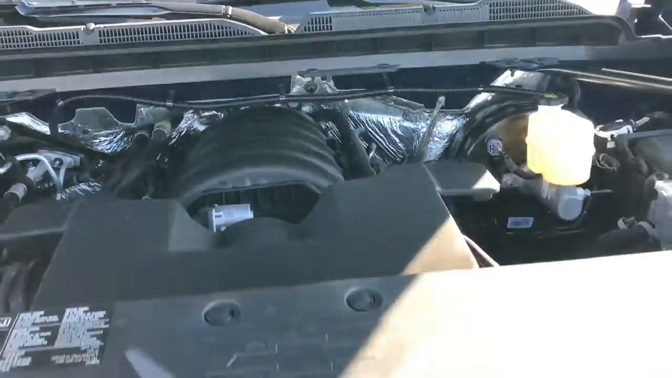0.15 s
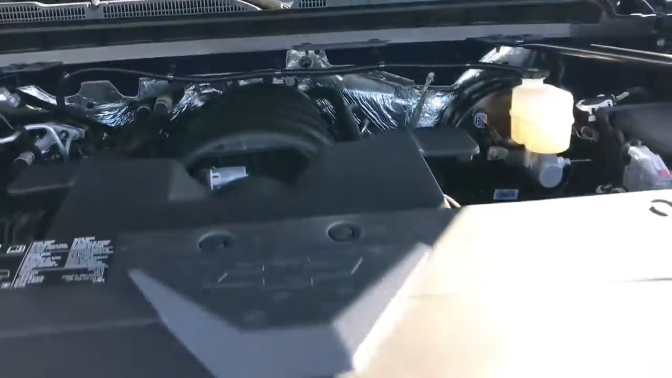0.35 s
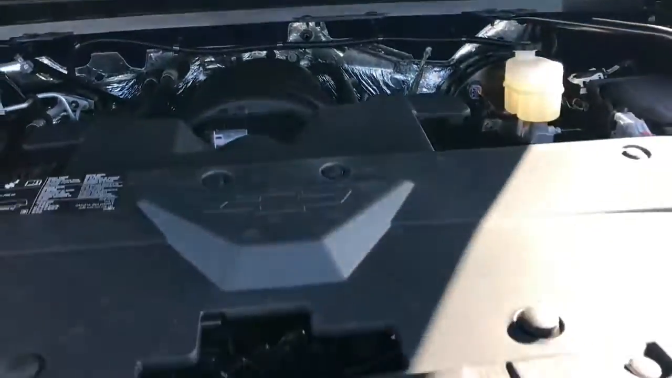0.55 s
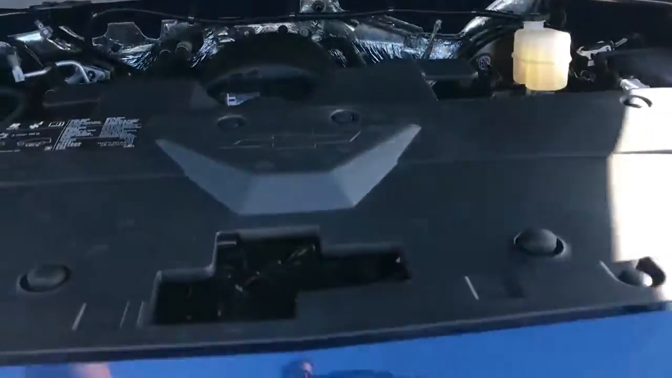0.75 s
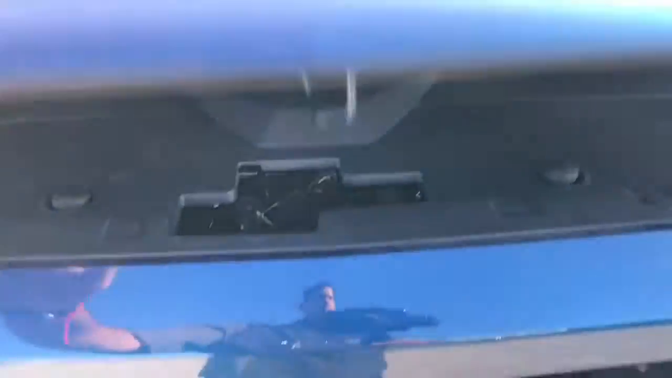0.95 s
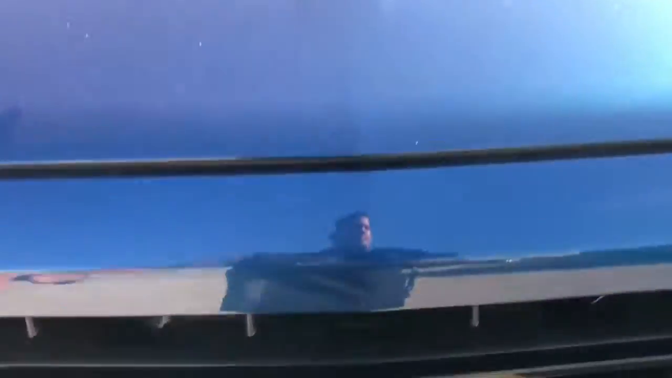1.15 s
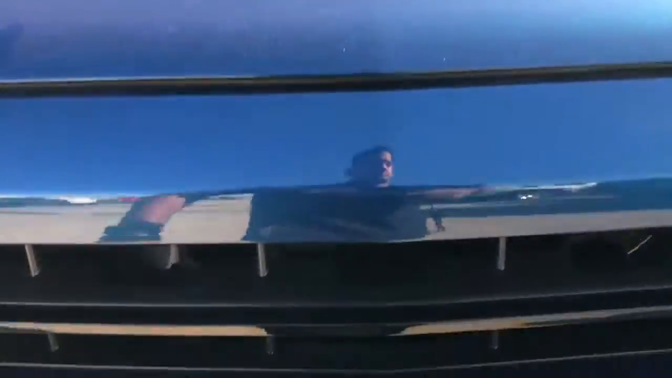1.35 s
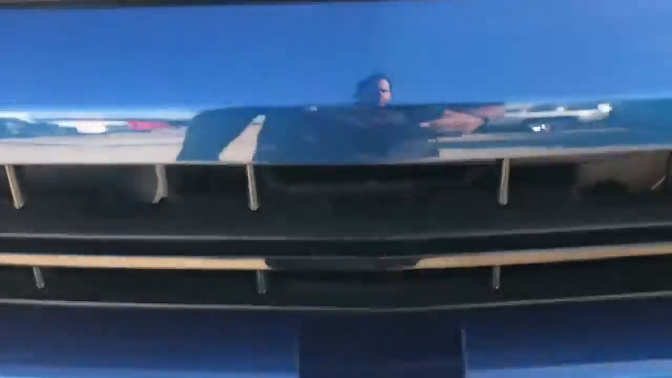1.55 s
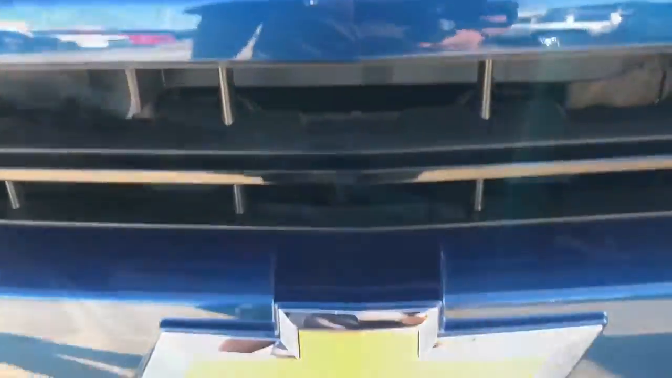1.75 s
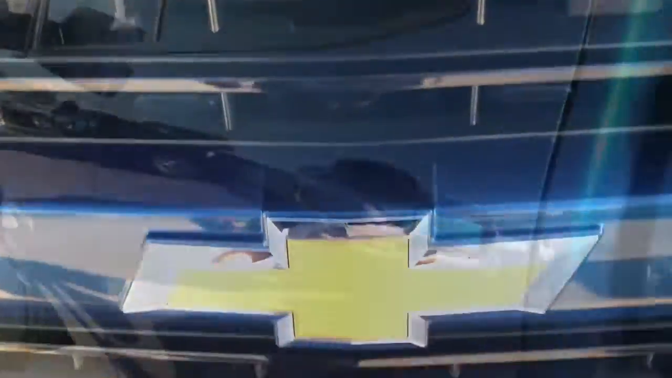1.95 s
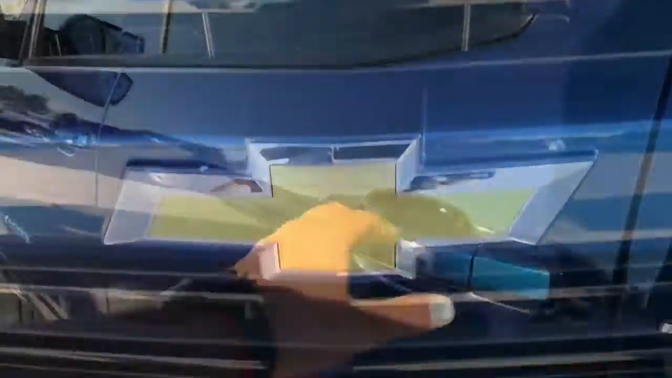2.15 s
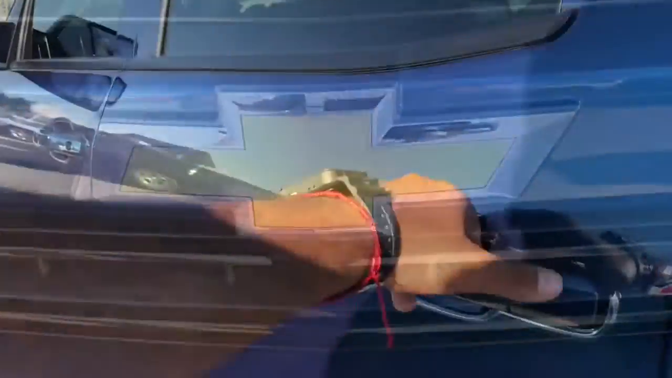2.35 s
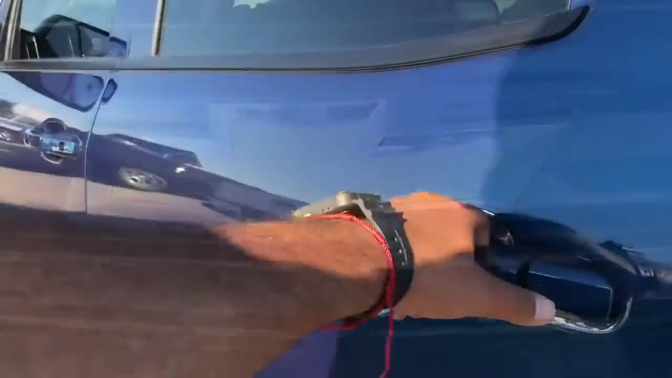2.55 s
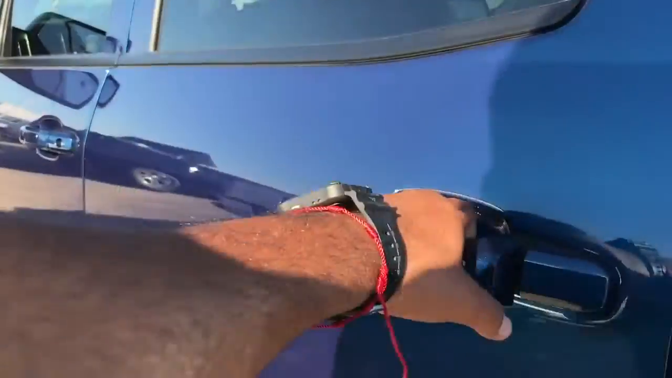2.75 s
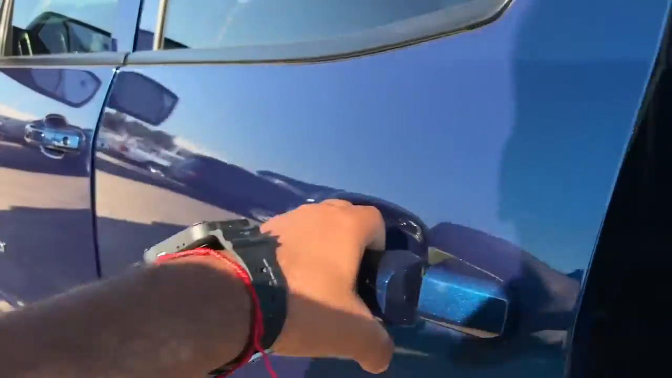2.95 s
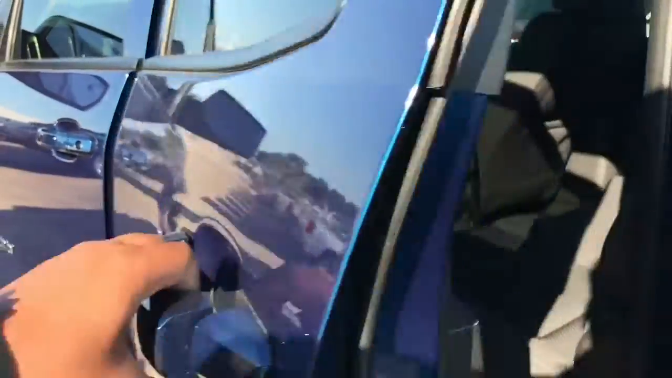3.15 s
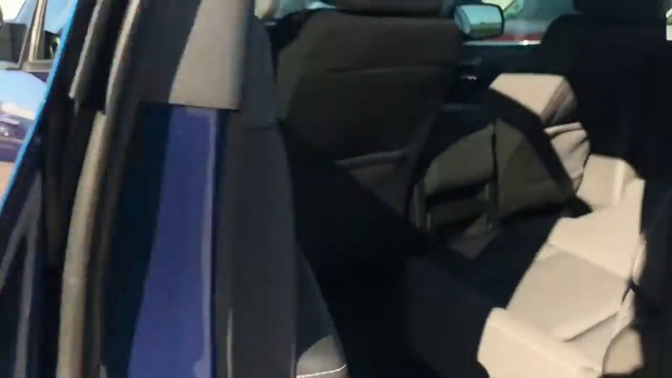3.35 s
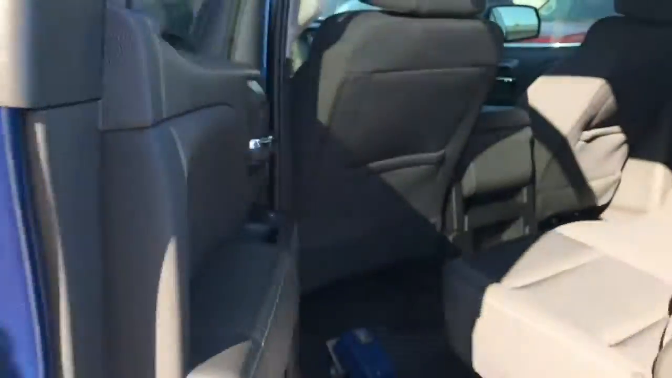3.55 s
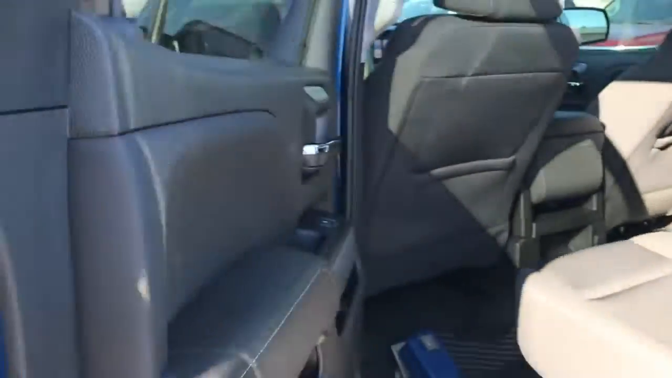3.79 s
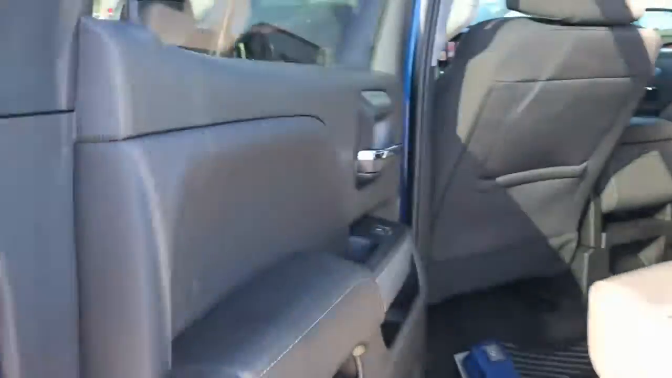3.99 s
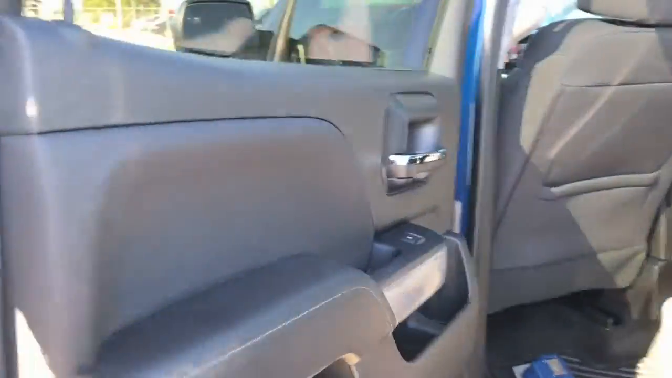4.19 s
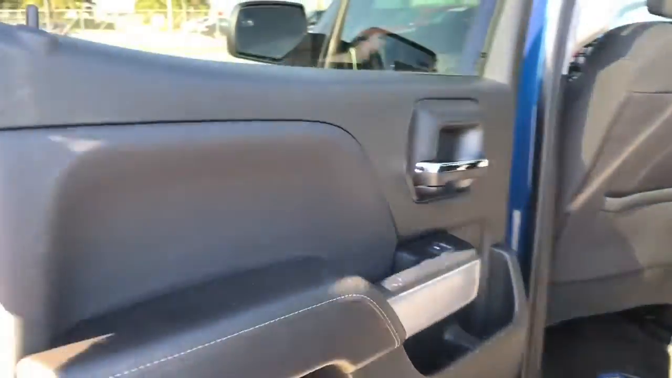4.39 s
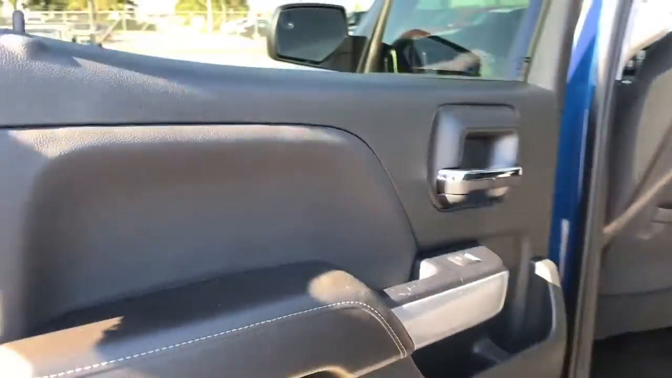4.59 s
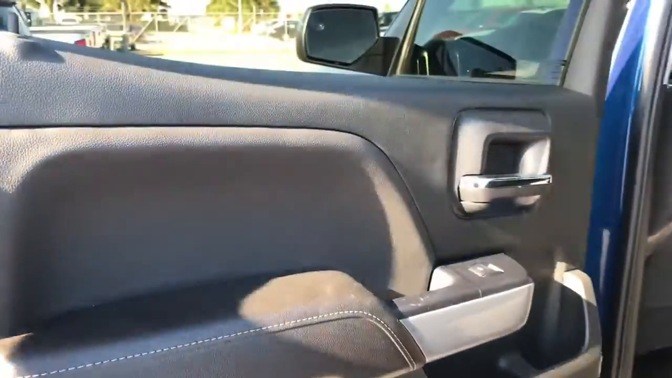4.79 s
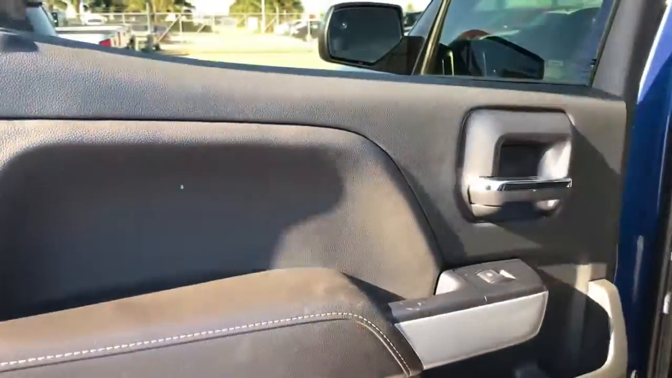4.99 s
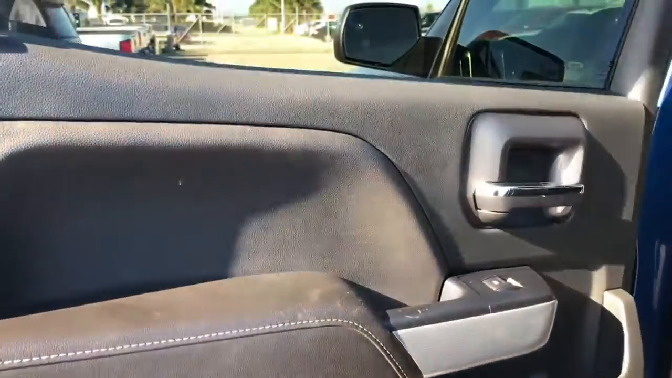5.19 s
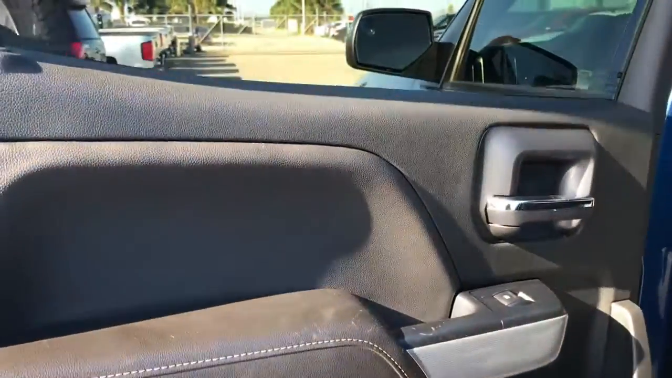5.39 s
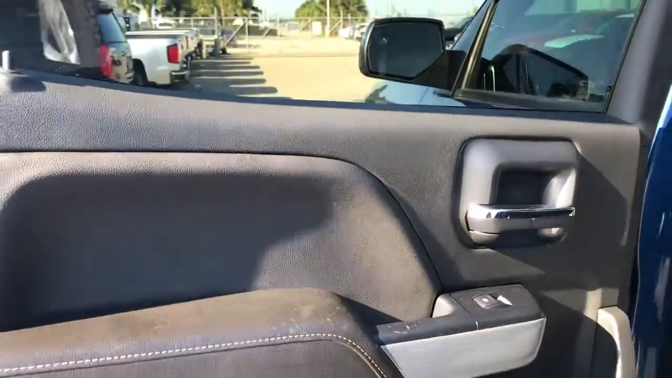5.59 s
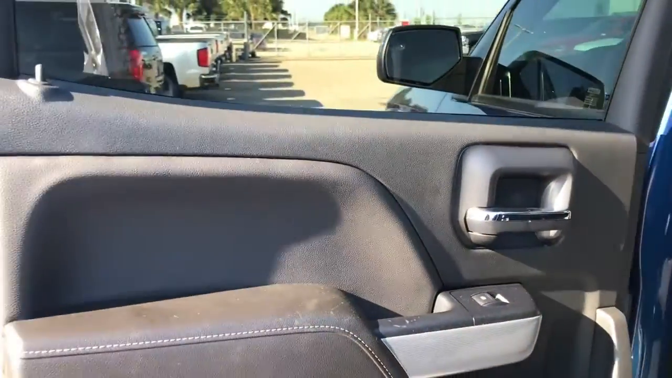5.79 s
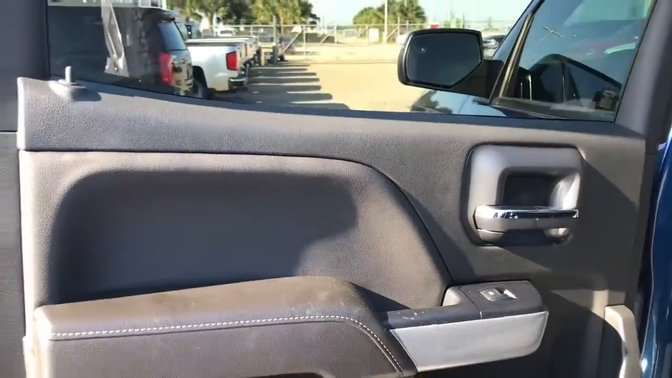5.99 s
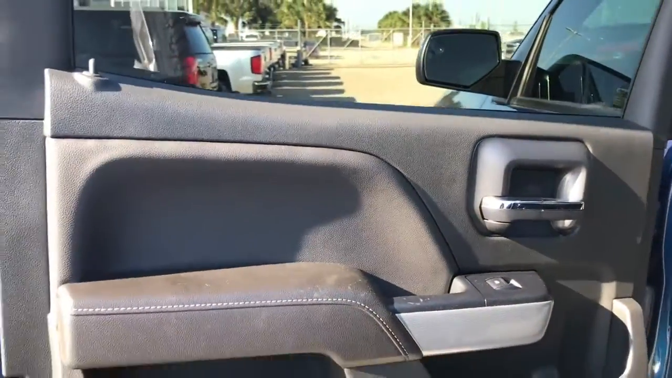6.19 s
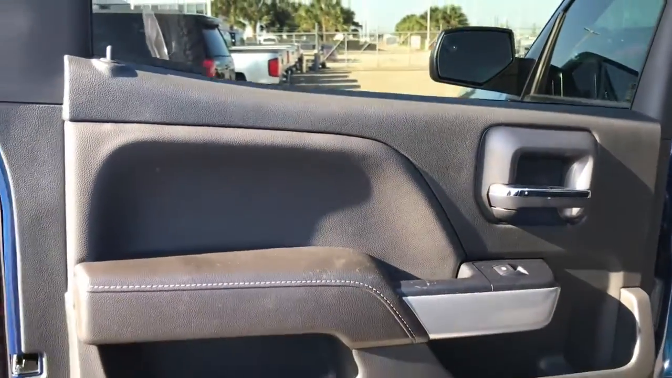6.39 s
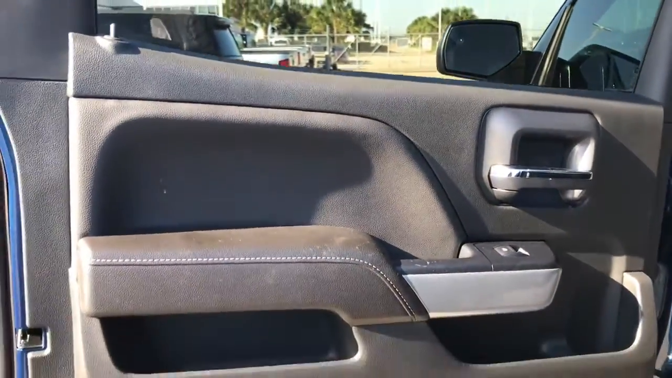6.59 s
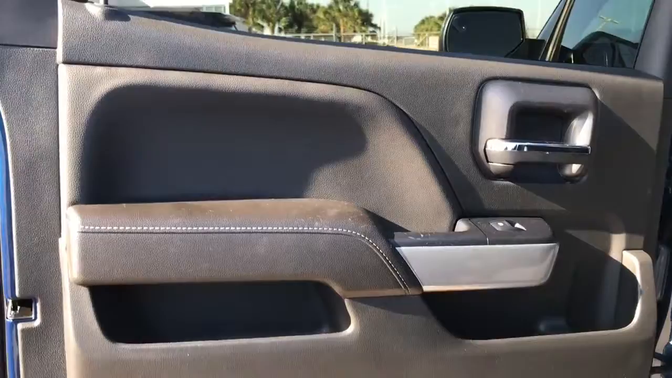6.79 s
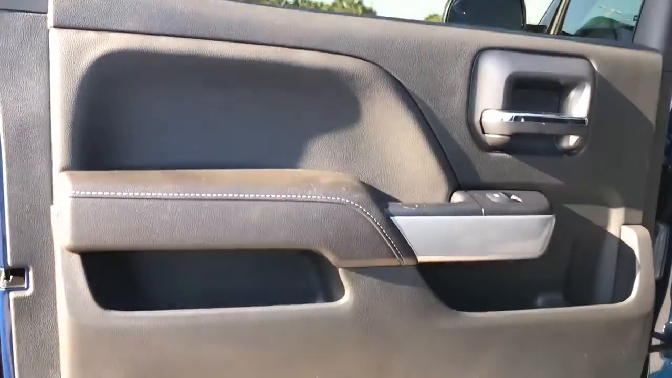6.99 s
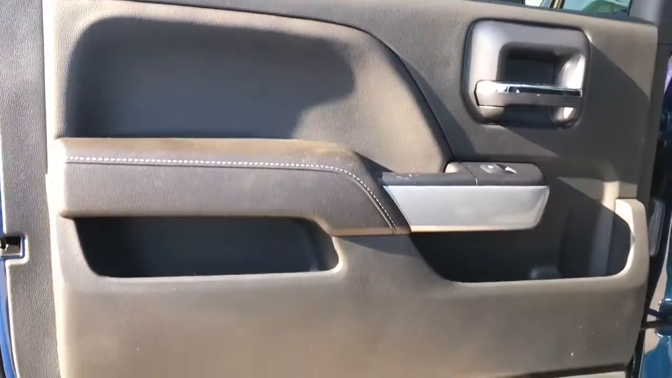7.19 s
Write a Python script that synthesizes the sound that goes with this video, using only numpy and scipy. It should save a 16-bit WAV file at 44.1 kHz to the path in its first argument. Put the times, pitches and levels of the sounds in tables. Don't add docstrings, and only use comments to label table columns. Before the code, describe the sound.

In an open car lot, low engine rumble, distant traffic and airy hiss continue throughout. Just after one second a pickup hood slams with dense metal clatter and a deep panel boom; the background briefly dips. The engine then grows louder with soft ticking and a fading fan tone. A handle clicks, a door latch clunks and thuds open, and a low motor drone swells twice amid faint cloth rustles. Close handheld microphone.

```python
import sys
import numpy as np
from scipy import signal
from scipy.fft import rfft, irfft, next_fast_len
from scipy.io import wavfile
from scipy.ndimage import uniform_filter1d, minimum_filter1d

SR = 44100
rng = np.random.default_rng(int(sys.argv[2]) if len(sys.argv) > 2 else 0)


def how_loud(loudness_db):
    steps = np.asarray(loudness_db, float) / 20
    return 10 ** steps


def wav_record(signal):
    frames = np.transpose(np.atleast_2d(signal))
    bounded = np.clip(frames, -1, 1)
    quanta = np.round(bounded * 32767).astype(np.int16)
    wavfile.write(sys.argv[1], SR, quanta)


N = 319284
TIME = np.arange(N) / SR
AFTER = np.arange(SR // 2) / SR

# (frequency [Hz], density [dB per Hz])
RUMBLE_SPECTRUM = [(12, -46), (20, -27), (42, -5), (59, 5), (97, -1), (124, -12), (140, -5.5), (180, -48),
                   (310, -120)]
GROWL_SPECTRUM = [(59, -27), (100, -5.5), (124, -8.5), (145, -4), (182, -2.5), (254, -6), (408, -11),
                  (520, -23), (680, -41), (1140, -120)]
TRAFFIC_FRONT = [(250, -39), (420, 0), (435, -3), (715, -3.5), (782, -8), (958, -4), (1100, -8),
                 (3500, -18), (4550, -25), (7700, -120)]
TRAFFIC_SIDE = [(250, -18), (420, 3.5), (463, -4.5), (553, 3.5), (615, 0.5), (1140, 1.5), (1950, -12),
                (3500, -17), (4550, -22.5), (7700, -120)]
HISS_FRONT = [(1290, -31), (2200, -5), (3430, -7), (5040, -9), (5940, -9.5), (7600, -13), (8250, -13),
              (8670, -12.5), (10300, -15), (14300, -15), (16000, -15.5)]
HISS_SIDE = [(1290, 1), (2200, 0), (2860, 1), (3630, -5.5), (4570, -2.5), (4920, -4.5), (7060, -6.5),
             (7660, -11), (8670, -7), (10600, -10), (14400, -8), (15300, -10), (16000, -12.5)]
# (frequency [Hz], width [Hz], level over the growl [dB])
TONES_FRONT = [(151.7, 5.9, -14), (225.7, 4.9, -10.5), (309, 24, -7.5), (404, 2.2, -11.5), (993, 90, -14.5)]
TONES_SIDE = [(59.56, 3.6, 0), (74.86, 3, -4), (117.86, 5.8, -3.5), (183.2, 8.1, -10), (227, 2.3, -14.5),
              (425, 13, -21.5)]
# (time [s], level [dB])
PASSING = [(0, 1.5), (.74, -1), (1.0, 1), (2.06, 0), (2.5, -1), (3.3, 1), (4.4, 0.17), (5.3, 1.5),
           (6.2, -1.5), (7.24, -2)]
# (time [s], level [dB], length [s])
GUSTS = [(.3, -5, .5), (1.69, 2.5, .1), (2.9, 2, .15), (3.652, 2.5, .08), (3.8, -4, 0.1), (4.4, 2.5, 0.14),
         (4.96, 2.5, 0.16), (5.28, -3, 0.16), (6.9, 5.5, 0.17)]
# (time [s], level [dB])
DRONE = [(4.6, -57), (4.75, -47), (4.98, -31), (5.38, -34), (5.8, -30.5), (6.2, -30), (6.32, -38),
         (6.43, -50), (6.68, -32), (7.04, -29.5), (7.24, -36)]
# (time [s], level [dB])
FAN = [(1.9, -67), (2.4, -47.5), (3.4, -51), (4.6, -67), (5.0, -66)]
# (frequency [Hz], width [Hz])
VALVE_RING = [(4040, 34), (4500, 250)]
# (time [s], signed height [1], frequency [Hz], t60 [s])
THUDS = [(.105, .06, 150, .05), (.395, .025, 75, .15), (1.505, .025, 60, .12), (1.53, .03, 130, .12),
         (3.055, -.06, 70, .15), (2.8488, .2, 300, .015), (2.8508, -.5, 200, .02), (2.8558, .3, 190, .03),
         (2.8682, .28, 230, .025), (2.86, -.05, 100, .15), (2.876, .06, 190, .12), (2.897, .07, 125, .15),
         (2.915, .07, 110, .15), (3.331, .04, 110, .06), (3.3395, .13, 115, .06), (3.348, .11, 75, .08),
         (3.3627, .62, 110, .014)]
# (time [s], peak level [dB], centre [Hz])
TICKS = [(1.299, -45, 3000), (1.333, -50, 2800), (2.398, -40, 1500), (2.593, -40, 2400), (2.652, -34, 1700),
         (2.661, -35, 2300), (2.677, -37, 1500), (2.81, -37, 2000), (2.849, -35, 3300), (2.8555, -38, 3000),
         (2.885, -33, 1500), (3.06, -50, 4000), (3.199, -45, 4000), (3.3918, -31, 2000), (3.686, -43, 4000),
         (4.016, -44, 3500)]
# (time [s], peak level [dB], centre [Hz], width [Hz], t60 [s])
RINGS = [(2.397, -38, 1460, 680, 0.75), (2.847, -22, 1030, 300, 0.036), (2.856, -22, 407, 180, 0.11),
         (2.8556, -16.5, 1180, 650, 0.023), (2.861, -25, 330, 220, 0.4), (2.86, -35.5, 1300, 1200, .15),
         (2.855, -35, 700, 400, .1), (3.393, -22.5, 900, 500, .04), (3.393, -32, 2870, 500, 0.017),
         (3.3925, -36, 4030, 500, 0.022), (4.016, -49, 4050, 300, .15), (5.095, -46, 3180, 250, .12)]
# (time [s], level [dB], length [s])
RUSTLES = [(2.656, -47, .012), (2.856, -42, 0.0032), (3.33, -56, .15), (3.398, -48, .004),
           (5.247, -53, .015), (5.465, -52, 0.041), (5.63, -57, .05), (6.315, -50, .012), (6.34, -51, .012),
           (6.683, -48.5, .025), (6.707, -48, .012), (6.73, -43.5, 0.02), (6.833, -57, .03),
           (6.92, -55, .04)]
# (time [s], rattle level [dB], rattle t60 [s], latch ring [Hz], ring level [dB])
SLAM = [(1.1673, -17.5, 0.08, 3800, -29), (1.172, -19, 0.041, 1720, -12.5), (1.175, -22, 0.03, 1150, -18),
        (1.1832, -13, 0.057, 4700, -11), (1.1835, -24, .05, 11600, -28), (1.189, -34, 0.054, 2290, -15),
        (1.194, -19.5, 0.078, 1190, -33), (1.208, -24, 0.06, 1150, -22), (1.219, -43, 0.13, 1250, -27),
        (1.234, -40, 0.07, 1000, -30), (1.256, -59, .1, 1600, -42)]
# (frequency [Hz], density [dB per Hz])
SHEET_SPECTRUM = [(150, -27), (250, -3), (336, -19), (407, -4.5), (802, -2), (1180, 1), (1980, -4),
                  (2240, -5), (3710, -7), (4570, -12), (5250, -11.5), (6470, -11), (16000, -11.5)]
# (time [s], signed strength [1])
BOOM_PUSH = [
    (1.1715, -.12),
    (1.1965, -1.0),
    (1.2535, -.08),
]
# (frequency [Hz], signed height [1], t60 [s], lag [s])
HOOD_MODES = [(50.5, -.36, .24, .002), (94, .5, .11, -.0015), (156, .32, .16, .0002),
              (168, .32, .16, .0002), (205, .06, .3, .001), (255, .1, .35, .001), (375, .08, .15, .001),
              (425, .06, .12, .001)]

FRONT_DB, SIDE_DB = (-48.5, -45, -49, -57), (-37, -41.5, -44.5, -55.5)
SHUT_DB = (1, 0, 0, -1.5)
TURN_S, TURN_DB = (3.5, 4.06), (0, 0, -1, 2.5)
FOLLOWS = (0.61, 1.6, 0.81, 0.14)
DUCK_S, DUCK_ATTACK_S, DUCK_RELEASE_S = 1.298, .12, .42
DUCK_DB = (-4, -12, -15.5, -16)
SHUT_S = SLAM[0][0]
DISSOLVE_S = (2.06, 2.5)
ARRIVAL_S = (2.27, 2.58)
BAY_HISS = (8215, 180, -72.5)

FAN_HZ, DRONE_HZ = 283.3, 115.8
OCTAVE_DB, OCTAVE_WANDER_DB = -51, 4.0
WHINE_HZ, WHINE_FROM_S, WHINE_DB, WHINE_FADE_DB_PER_S = 14986, 2.3, -76, 2.5
WHINE_SWELL = (4.25, 14, .15)   # (time [s], level [dB], length [s])
VALVE_RATE_HZ, VALVE_FIRST_S, VALVE_DB = 9.3, 2.428, -62.5
TICK_WIDTH_SHARE, TICK_T60_S = 1.06, .022
LATCH_WIDTH_HZ = 180
BODY_DB, BODY_T60_S = -18, 0.29
LIMIT = 0.29
PORT_NOTCH = (10500, 540, 0.29)
TOP_HZ = 15790


def rms_one(x):
    return x / np.sqrt(np.mean(x ** 2) + 1e-20)


def in_time(rows):
    s, *columns = np.transpose(rows)
    return [np.interp(TIME, s, c) for c in columns]


def drift(rate_hz):
    r = np.exp(-80 * np.pi * rate_hz / SR)
    noise = rng.standard_normal(N // 40 + 2002)
    slow = signal.lfilter([1], [1, -2 * r, r * r], noise)[2000:]
    return np.interp(np.arange(N) / 40, np.arange(len(slow)), rms_one(slow))


def bump(s, length_s):
    return np.exp(-((TIME - s) / length_s) ** 2)


def colour(x, spectrum):
    hz, level_db = np.transpose(spectrum)
    size = next_fast_len(len(x))
    log_hz = np.log(np.maximum(np.fft.rfftfreq(size, 1 / SR), 1))
    gain = how_loud(np.interp(log_hz, np.log(hz), level_db, -90))
    return rms_one(irfft(rfft(x, size) * gain, size)[:len(x)])


def resonance(x, hz, width_hz):
    r = np.exp(-np.pi * width_hz / SR)
    zeros = np.array([1, 0, -1]) * (1 - r * r) / 2
    return signal.lfilter(zeros, [1, -2 * r * np.cos(2 * np.pi * hz / SR), r * r], x)


def narrow_noise(x, hz, width_hz):
    return rms_one(resonance(resonance(x, hz, width_hz), hz, width_hz))


def butter(x, order, hz, kind="low"):
    return signal.sosfilt(signal.butter(order, hz, kind, fs=SR, output="sos"), x)


def dying(t60_s):
    return how_loud(-60 * AFTER / t60_s)


def ringing(hz, t60_s):
    return dying(t60_s) * np.sin(2 * np.pi * hz * AFTER)


def add(out, s, sound):
    start = round(s * SR)
    out[start:start + len(sound)] += sound


def limited(x):
    gain = minimum_filter1d(LIMIT / np.maximum(np.abs(x), LIMIT), size=120)
    return x * uniform_filter1d(gain, size=120)


def layer_levels():
    rows = (FRONT_DB, SIDE_DB, SHUT_DB, TURN_DB, FOLLOWS, DUCK_DB)
    front, side, shut, turn, follows, depth = (np.array(row)[:, None] for row in rows)
    front = front + shut * (TIME > SHUT_S)
    place = front + (side - front) * np.interp(TIME, ARRIVAL_S, [0, 1])
    place = place + turn * np.interp(TIME, TURN_S, [0, 1])
    duck = np.interp(TIME, [DUCK_S - DUCK_ATTACK_S, DUCK_S, DUCK_S + DUCK_RELEASE_S], [0, 1, 0]) ** 1.64
    levels = place + follows * in_time(PASSING)[0] + depth * duck
    levels[0] += sum(level_db * bump(s, length_s) for s, level_db, length_s in GUSTS)
    return levels


def lot():
    rumble_db, growl_db, traffic_db, hiss_db = layer_levels()
    side = np.sqrt(np.interp(TIME, DISSOLVE_S, [0, 1]))
    front = np.sqrt(1 - side ** 2)
    white = rng.standard_normal((6, N))
    rumble = how_loud(rumble_db + 1.2 * drift(1.9)) * colour(white[0], RUMBLE_SPECTRUM)
    traffic = front * colour(white[1], TRAFFIC_FRONT) + side * colour(white[2], TRAFFIC_SIDE)
    traffic = how_loud(traffic_db + 1.27 * drift(5.7)) * traffic
    hiss = front * colour(white[3], HISS_FRONT) + side * colour(white[4], HISS_SIDE)
    hiss = how_loud(hiss_db + 0.96 * drift(16)) * hiss
    growl = how_loud(1.0 * drift(8.2)) * colour(white[5], GROWL_SPECTRUM)
    for share, tones in ((front, TONES_FRONT), (side, TONES_SIDE)):
        for hz, width_hz, level_db in tones:
            growl += share * how_loud(level_db) * narrow_noise(white[4], hz, width_hz)
    hz, width_hz, level_db = BAY_HISS
    bay = (TIME < SHUT_S) * how_loud(level_db) * narrow_noise(white[0], hz, width_hz)
    return bay + rumble + how_loud(growl_db) * growl + traffic + hiss


def motor():
    level_db, = in_time(DRONE)
    turn = 2 * np.pi * np.cumsum(DRONE_HZ + .6 * drift(4.0)) / SR
    on = np.clip((TIME - DRONE[0][0]) * 10, 0, 1)
    drone = how_loud(level_db + 1.3 * drift(6.0)) * np.sin(turn)
    octave = how_loud(OCTAVE_DB + OCTAVE_WANDER_DB * drift(5.0)) * np.sin(2 * turn)
    fan_level = (TIME > FAN[0][0]) * how_loud(in_time(FAN)[0] + 1.5 * drift(5.9))
    fan = fan_level * np.sin(2 * np.pi * FAN_HZ * TIME)
    s, swell_db, length_s = WHINE_SWELL
    whine_db = WHINE_DB + swell_db * bump(s, length_s) - WHINE_FADE_DB_PER_S * np.abs(TIME - s)
    whine_phase = 2 * np.pi * np.cumsum(WHINE_HZ + 5.0 * drift(3)) / SR
    whine = (TIME > WHINE_FROM_S) * how_loud(whine_db + 3.5 * drift(6)) * np.sin(whine_phase)
    return np.sqrt(2) * (on * (drone + octave) + fan + whine)


def valves():
    turns = (TIME - VALVE_FIRST_S) * VALVE_RATE_HZ + .03 * drift(2.8)
    gate = (TIME > VALVE_FIRST_S - .03) * np.exp(-((turns + .5) % 1 - .5) ** 2 / 0.032)
    turn_number = np.clip(turns + .5, 0, 98).astype(int)
    out = 0
    for hz, width_hz in VALVE_RING:
        strength = how_loud(rng.normal(0, 1.8, 99))[turn_number]
        out = out + strength * gate * rms_one(resonance(rng.standard_normal(N), hz, width_hz))
    return how_loud(VALVE_DB) * out


def door():
    out = np.zeros(N)
    for s, height, hz, t60_s in THUDS:
        add(out, s, butter(height * ringing(hz, t60_s), 2, 550))
    ticks = [(s, level_db, hz, TICK_WIDTH_SHARE * hz, TICK_T60_S) for s, level_db, hz in TICKS]
    for s, level_db, hz, width_hz, t60_s in RINGS + ticks:
        burst = rng.standard_normal(len(AFTER)) * dying(t60_s)
        edge = resonance(burst, hz, width_hz)
        click = resonance(edge, hz, width_hz) + 0.18 * edge
        add(out, s, how_loud(level_db) * click / np.abs(click).max())
    dry_noise = butter(rng.standard_normal(N), 1, 3500, "high")
    rubbing = sum(how_loud(level_db) * bump(s, length_s / 2) for s, level_db, length_s in RUSTLES)
    return out + dry_noise * rubbing


def hood():
    rattle, boom = np.zeros((2, N))
    for s, level_db, t60_s, ring_hz, ring_db in SLAM:
        grit = rng.standard_normal(len(AFTER)) * how_loud(3.33 * rng.exponential(1, len(AFTER)))
        sheet = colour(grit, SHEET_SPECTRUM)
        low = butter(sheet, 1, 2500)
        add(rattle, s, how_loud(level_db) * (low * dying(2.22 * t60_s) + (sheet - low) * dying(t60_s)))
        latch = rms_one(resonance(grit, ring_hz, LATCH_WIDTH_HZ))
        add(rattle, s, how_loud(ring_db) * latch * dying(0.55 * t60_s))
    for s, push in BOOM_PUSH:
        for hz, height, t60_s, lag_s in HOOD_MODES:
            swell = np.tanh(AFTER * hz * 0.86)
            add(boom, s + lag_s, push * height * swell * ringing(hz, t60_s))
    body = rms_one(butter(rng.standard_normal(len(AFTER)), 2, [90, 650], "band"))
    add(boom, SHUT_S, how_loud(BODY_DB) * body * dying(BODY_T60_S) * np.tanh(AFTER / 0.03))
    boom = butter(boom, 1, 900)
    return limited(LIMIT * np.tanh(rattle / LIMIT) + boom)


def scene():
    return (lot() + motor() + valves() + door() + hood())[None]


def top_cut(x):
    return signal.sosfilt(signal.butter(12, 16840, fs=SR, output="sos"), x)


def record(dry):
    mix = butter(dry, 3, 32, "high")
    hz, width_hz, share = PORT_NOTCH
    mix = mix - share * resonance(mix, hz, width_hz)
    mix = signal.sosfilt(signal.ellip(12, .3, 45, TOP_HZ, fs=SR, output="sos"), mix)
    return top_cut(mix)


dry = scene()
out = record(dry)
wav_record(out)
```